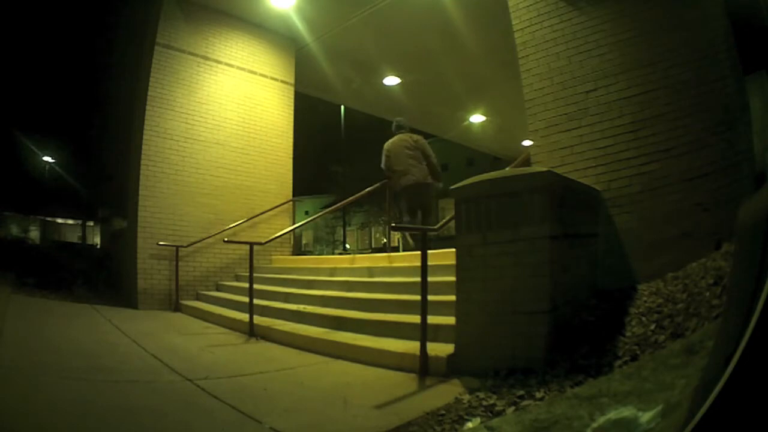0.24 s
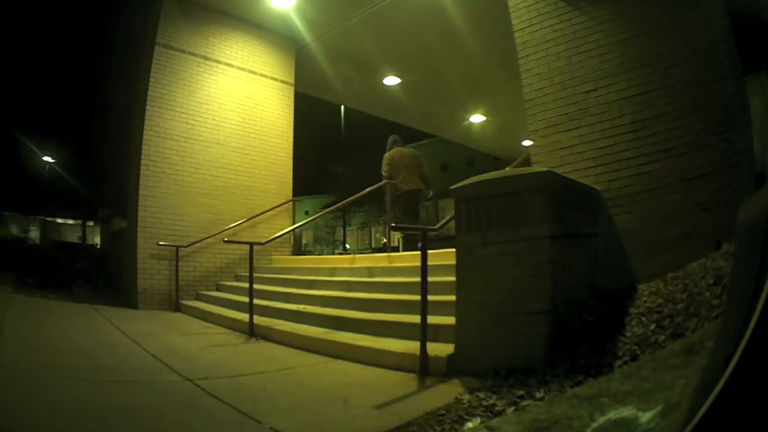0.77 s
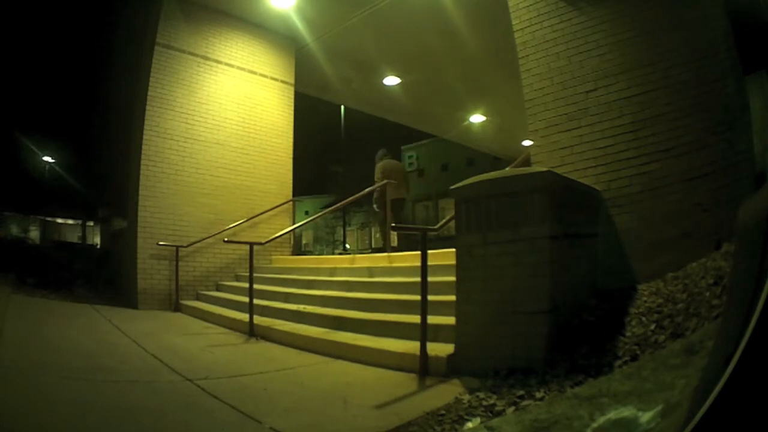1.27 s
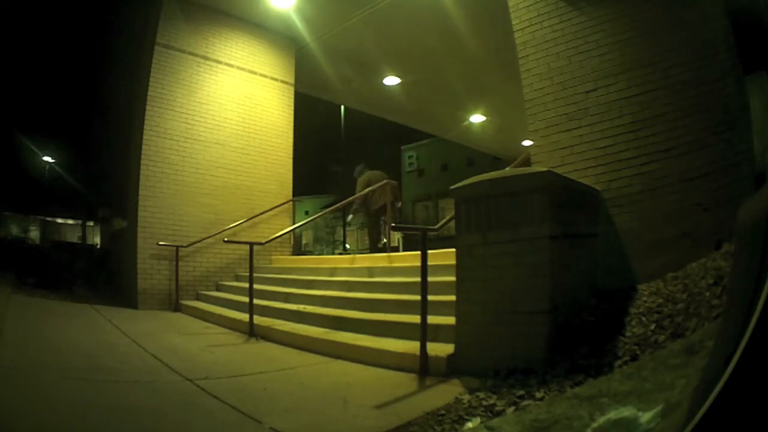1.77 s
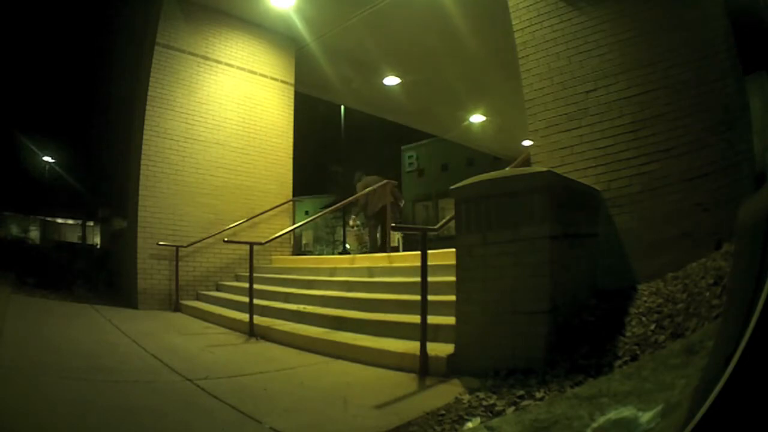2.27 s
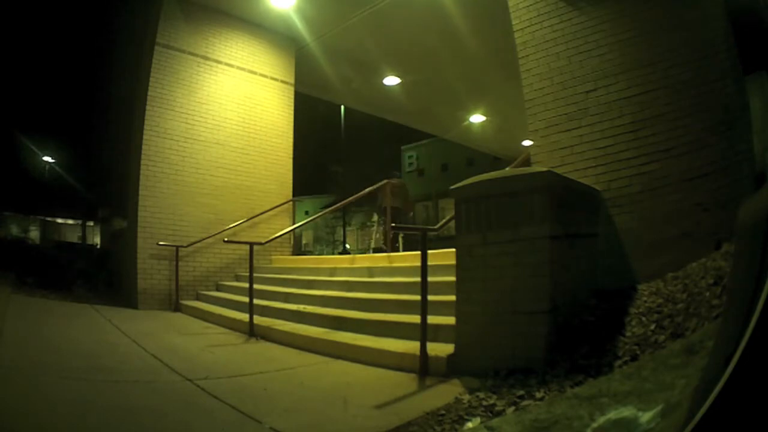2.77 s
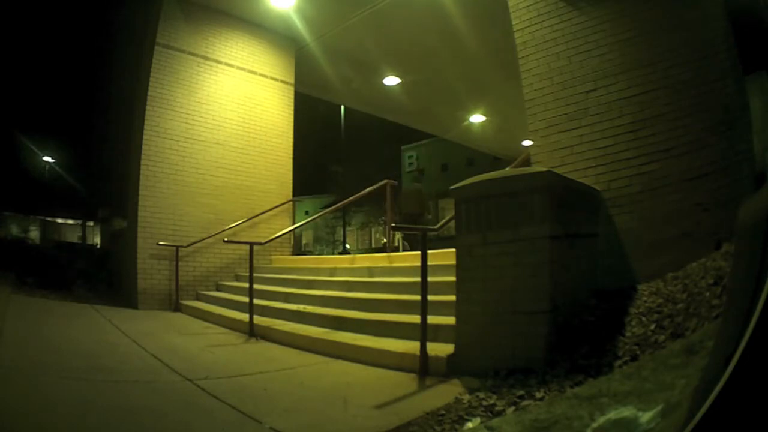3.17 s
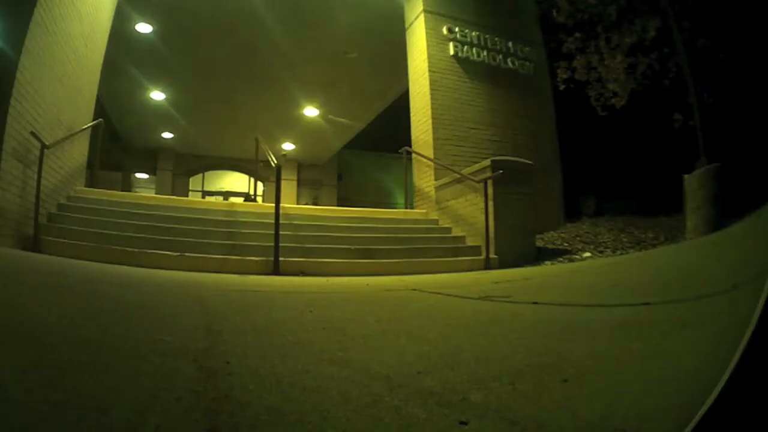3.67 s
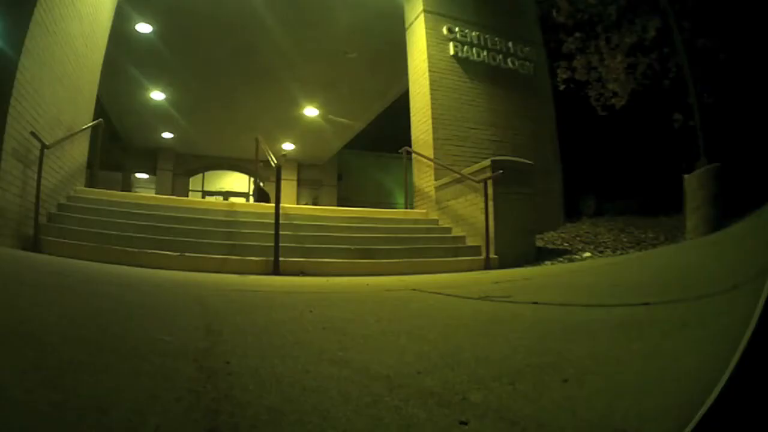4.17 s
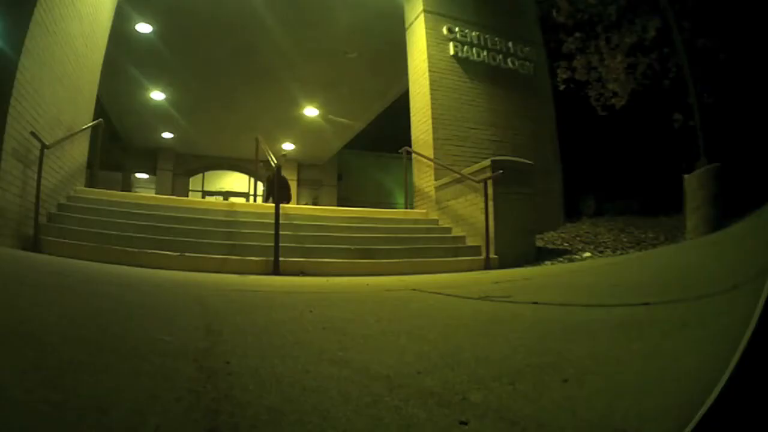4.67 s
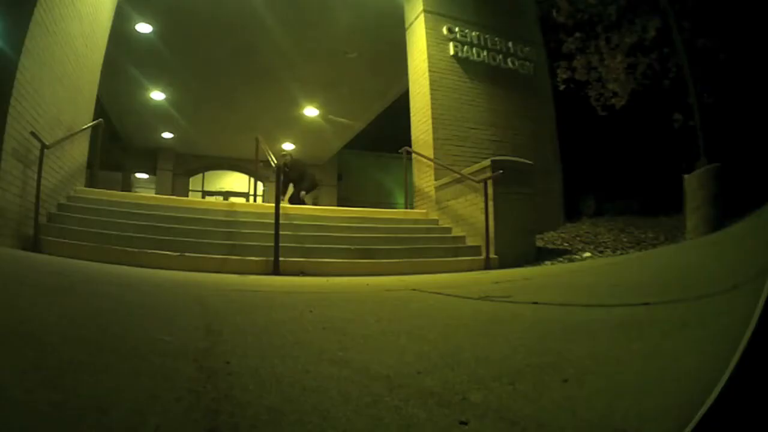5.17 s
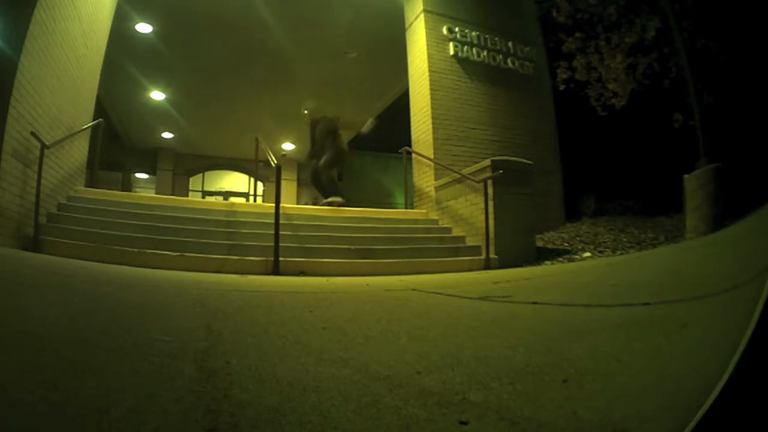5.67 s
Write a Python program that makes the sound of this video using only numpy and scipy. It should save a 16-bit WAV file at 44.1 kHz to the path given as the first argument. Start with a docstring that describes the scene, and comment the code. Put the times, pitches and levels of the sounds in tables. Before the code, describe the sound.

At night under a brick entrance canopy, a lamp buzzes thinly over a faint town hum. A few soft footsteps pass, then a skateboard is set down with several echoing wooden knocks. After a brief dip to silence, the board is heard from a second spot, rolling closer over rough concrete and clacking across slab joints. It ends with a sharp tail pop and a shoe scraping the grip tape.

```python
"""Night under a brick entrance canopy. A lamp buzzes over the hum of the town, and soft footsteps come up.
A skateboard is set down and stepped on; ceiling and walls throw every knock back.
After a short fade, from a second spot, the board rolls closer: rough concrete shakes the wheels,
the bearings fizz, and the axles clack across the slab joints. Last, the skater crouches,
pops the tail against the ground and drags a shoe up the grip tape."""
import sys
import numpy as np
from scipy import signal
from scipy.fft import rfft, irfft
from scipy.io import wavfile

SR = 44100
rng = np.random.default_rng(int(sys.argv[2]) if len(sys.argv) > 2 else 0)


def generate_wav(signal):
    """Clip the signal to [-1, 1] and save it as 16-bit WAV at the path in sys.argv[1]."""
    frames = np.transpose(np.atleast_2d(signal))
    scaled = np.clip(frames, -1, 1) * 32767
    pcm = np.round(scaled).astype(np.int16)
    wavfile.write(sys.argv[1], SR, pcm)


N = 261513
T = np.arange(N) / SR
SECOND_SPOT_S, POP_S = 3.5, 5.8424
HIGHEST_HZ = 15400


def gain_of(db):
    """Turns decibels into a number to multiply by."""
    return 10 ** (np.asarray(db) / 20)


def unit_level(x):
    """Scales a sound to an average (rms) level of 1."""
    return x / np.sqrt(np.mean(x ** 2) + 1e-20)


def noise(length=N):
    """Plain white hiss."""
    return rng.standard_normal(length)


def look_up(points, hz):
    """Reads between the rows of a table, on a log-frequency scale."""
    table_hz, value = np.transpose(points)
    return np.interp(np.log(hz + 1), np.log(table_hz + 1), value)


def add(mix, start_s, sound):
    """Mixes a sound in at a given time."""
    part = mix[round(start_s * SR):][:len(sound)]
    part += sound[:len(part)]


def coloured(x, points):
    """Makes each frequency louder or softer, as a table says."""
    return irfft(rfft(x) * gain_of(look_up(points, np.fft.rfftfreq(len(x), 1 / SR))), len(x))


def band(x, low_hz, high_hz, order=3):
    """Keeps what lies between two frequencies."""
    edges = [low_hz, min(high_hz, SR / 2.05)]
    return signal.sosfilt(signal.butter(order, edges, "band", fs=SR, output="sos"), x)


def lowpass(x, hz, order=2):
    """Softens everything above a frequency."""
    return signal.sosfilt(signal.butter(order, hz, fs=SR, output="sos"), x)


def drift(hz):
    """A slow random wobble of level 1."""
    return unit_level(lowpass(noise(), hz))


def tone_filter(x, gain_at, size=4096):
    """Filters by gain_at(hz), with no ringing ahead of a click."""
    hz = abs(np.fft.fftfreq(size, 1 / SR))
    log_gain = np.log(np.maximum(gain_at(hz), 1e-3))
    taps = np.fft.ifft(np.exp(np.conj(signal.hilbert(log_gain)))).real
    return signal.oaconvolve(x, taps[:size // 2])[:len(x)]


# the main tones of the lamp housing (frequency [Hz], level [dB])
LAMP_TONES = [(1680, -58.5), (2998, -56.5), (3241, -53), (3359, -54.5), (3478, -60.5), (3957, -61),
              (4081, -53), (4199, -61), (4436, -57), (4678, -51.5), (4797, -70.5), (4915, -45.5),
              (5039, -49), (5157, -54), (5276, -56), (5399, -57.5), (5879, -61.5), (5938, -56), (5997, -67),
              (6115, -57), (6239, -76.5), (6358, -50), (6417, -66), (6476, -53), (6595, -59.5), (6718, -94),
              (6837, -92), (6955, -60), (7197, -60.5), (9717, -72.5)]
# a few thin outlying tones (frequency [Hz], level [dB])
LAMP_THIN_TONES = [(360, -66.5), (720, -64), (7556, -67.5), (9055, -73), (9595, -93), (9955, -73),
                   (11994, -80)]
# outline of the faint tones in between (frequency [Hz], level [dB])
LAMP_FAINT_TONES = [(120, -72), (240, -78), (480, -65), (600, -70), (720, -66), (1000, -73), (1900, -75.5),
                    (2700, -72), (4500, -97), (6500, -60), (8300, -95), (9600, -85.5), (11500, -100.5),
                    (15000, -93)]
def lamp_buzz(mains_hz=59.969, flutter_db=0.14, uneven_db=4, odd_db=-6):
    """The lamp's ballast coil kicks its housing as the arc strikes and dies, each half mains cycle."""
    listed = {round(hz / mains_hz): db for hz, db in list(LAMP_TONES) + list(LAMP_THIN_TONES)}
    harmonics = np.arange(2, int(HIGHEST_HZ / mains_hz))
    faint_db = look_up(LAMP_FAINT_TONES, harmonics * mains_hz) + odd_db * (harmonics % 2)
    faint_db += uneven_db * noise(len(harmonics))
    levels_db = [listed.get(n, db) for n, db in zip(harmonics, faint_db)]
    lag = np.pi / 2 * (harmonics // 2 % 2)  # quarter-turn delays make the pair of kicks
    lag += .007 * harmonics ** 2  # the sheet metal smears each kick
    lag += 0.66 * noise(len(harmonics))  # wall reflections shift each tone
    turn = np.linspace(0, 1, 8193)
    cycle = gain_of(levels_db) @ np.cos(2 * np.pi * harmonics[:, None] * turn - lag[:, None])
    return np.sqrt(2) * np.interp(T * mains_hz % 1, turn, cycle) * gain_of(flutter_db * drift(6.8))


# tone colour of the night air (frequency [Hz], relative level [dB])
AIR_COLOUR = [(15, -5.5), (55, 1), (130, -4.5), (260, -10.5), (700, -12.5), (1000, -17.5), (1300, -11),
              (1700, -19), (3300, -22), (4800, -12), (7000, -22), (8600, -28), (10000, -33), (15000, -39.5)]
def night_air(db=-49.5, swell_db=.5):
    """The distant town rumbles and hisses."""
    return gain_of(db + swell_db * drift(4)) * unit_level(coloured(noise(), AIR_COLOUR))


# soft footfalls (time [s], level [dB])
FOOTFALLS = [(0.189, -47.5), (.265, -53), (.95, -51), (1.79, -54)]
def footsteps(rise_s=0.0032, fade_s=0.04):
    """Rubber soles land with dull puffs."""
    out, t = np.zeros(N), np.arange(SR // 4) / SR
    for start_s, db in FOOTFALLS:
        puff = unit_level(band(noise(len(t)), 280, 1200, order=2))
        add(out, start_s, gain_of(db) * puff * np.minimum(t / rise_s, 1) * np.exp(-t / fade_s))
    return out


def rustle(start_s=1.04, db=-61.5, rise_s=.015, fade_s=0.18):
    """A faint high rustle as the skater walks up."""
    age = np.maximum(T - start_s, 0)
    hiss = unit_level(band(noise(), 8500, 14000, order=1))
    return gain_of(db) * hiss * np.minimum(age / rise_s, 1) * np.exp(-age / fade_s)


# the notes a struck board rings with (frequency [Hz], relative level [dB], time to fade 60 dB [s])
BOARD_NOTES = [(162, -18.5, 0.11), (300, -15, 0.078), (403, -13, 0.066), (547, -8, 0.15), (793, -4, 0.035),
               (1033, 0, 0.014), (1320, -0.5, 0.016), (1715, 2.5, 0.0096), (2033, -0.5, 0.01),
               (3160, 7.5, 0.0048), (3860, 3.5, 0.0056), (4506, 2, 0.0091), (6300, -1.5, 0.0046)]
def board_blows(rows, snap_db, snap_s, snap_hz, detune, low_hz, contact_s, top_db):
    """Each blow snaps on the concrete, rings the board and echoes under the roof."""
    out, t = np.zeros(N), np.arange(SR * 3 // 5) / SR
    hz, note_db, ring_s = np.transpose(BOARD_NOTES)[:, :, None]
    for start_s, db, bass_db, treble_db, room_db in rows:
        pitch = hz * (1 + detune * noise(hz.shape))
        notes = np.sin(2 * np.pi * (pitch * t + rng.random(hz.shape)))
        ring = (gain_of(note_db - 60 * t / ring_s) * notes).sum(0)
        snap = gain_of(snap_db) * lowpass(noise(len(t)), snap_hz, order=1) * np.exp(-t / snap_s)
        struck = band((ring + snap) * np.minimum(t / contact_s, 1), low_hz, SR / 2)
        colour = [(330, bass_db), (800, 0), (2300, 0), (3200, treble_db), (7000, treble_db),
                  (12000, treble_db / 2 + top_db)]
        hit = gain_of(db) * tone_filter(struck, lambda f: gain_of(look_up(colour, f)))
        walls_db = 0 if start_s < SECOND_SPOT_S else -7  # the second spot stands clear of the walls
        add(out, start_s, with_echoes(hit, walls_db) + gain_of(room_db) * canopy_ring(hit))
    return out


# the deck's knocks (time [s], level [dB], extra bass [dB], extra treble [dB], room sound [dB])
DECK_KNOCKS = [(2.031, -34.5, -3.5, -1, 8), (2.067, -40, 10, 0, 4), (2.1605, -17, 0, 3.5, 1),
               (2.3410, -21, 2, -11.5, 3), (2.4452, -30, -0.5, -9, 4.5), (5.8424, -10.5, -5, -5, -3.5),
               (5.921, -24.5, -6, -14, 0)]
def deck_knocks():
    """The board hits the ground as it is set down, stepped on and finally popped."""
    return board_blows(DECK_KNOCKS, snap_db=7.5, snap_s=0.0011, snap_hz=4400, detune=0.014,
                       low_hz=258, contact_s=0.00026, top_db=-3)


# bounces off the ceiling and walls (delay [s], relative level [dB])
WALL_ECHOES = [(.0102, -5), (.0228, -14), (.0283, -17)]
def with_echoes(x, walls_db):
    """Hard surfaces nearby add late, quieter copies of a sound."""
    out = x.copy()
    for delay_s, db in WALL_ECHOES:
        add(out, delay_s, gain_of(db + walls_db) * x)
    return out


# how long sound lingers under the roof (frequency [Hz], time to fade 60 dB [s])
CANOPY_RING_TIMES = [(150, 1), (500, 0.66), (1400, 0.63), (4000, 0.42), (12000, 0.21)]
def canopy_ring(x, scatter_db=-5, scatter_s=0.016, tail_db=-10):
    """Steps and pillars scatter a sound, then it rings on under the roof."""
    t = np.arange(len(x)) / SR
    hz, age, spectrum = signal.stft(noise(len(x)), SR, nperseg=256)
    dying = gain_of(-60 * age / look_up(CANOPY_RING_TIMES, hz)[:, None])
    tail = signal.istft(spectrum * dying, SR, nperseg=256)[1][:len(x)]
    scatter = noise(len(x)) * np.exp(-t / scatter_s)
    build_up = np.clip(t / 0.0054 - .2, 0, 1)
    response = sum(gain_of(db) * build_up * part / np.linalg.norm(build_up * part)
                   for db, part in [(scatter_db, scatter), (tail_db, tail)])
    return signal.fftconvolve(x, response)[:len(x)]


# a clink as the board is lowered (time [s], level [dB], pitch [Hz])
TRUCK_CLINKS = [(2.040, -14, 4190)]
def truck_clink(length_s=.0021, room_db=-10):
    """A truck, the metal axle mount, gives a very short tick."""
    out, t = np.zeros(N), np.arange(SR // 3) / SR
    shape = np.sin(np.pi * np.minimum(t / length_s, 1))
    for start_s, db, hz in TRUCK_CLINKS:
        tick = gain_of(db) * shape * np.sin(2 * np.pi * hz * t)
        add(out, start_s, tick + gain_of(room_db) * canopy_ring(tick))
    return out


# the wood's notes (time [s], level [dB], pitch [Hz], crack level [dB])
PLYWOOD_NOTES = [(2.1603, -16, 1373, -9), (3.7182, -16, 1205, -34), (5.8422, -17, 975, -9.5)]
def plywood(ring_s=0.054, crack_hz=3320, crack_s=0.013, rise_s=0.00032, room_db=-6):
    """Hard blows make the plywood sing briefly, with a crack on top."""
    out, t = np.zeros(N), np.arange(SR // 2) / SR
    for start_s, db, hz, crack_db in PLYWOOD_NOTES:
        note = gain_of(db - 60 * t / ring_s) * np.sin(2 * np.pi * hz * t)
        note += gain_of(crack_db - 60 * t / crack_s) * np.sin(2 * np.pi * crack_hz * t)
        note *= np.minimum(t / rise_s, 1)
        add(out, start_s, note + gain_of(room_db) * canopy_ring(note))
    return out


# the concrete slabs (time reached [s], roughness [dB], thump level [dB])
CONCRETE_SLABS = [(3.69, 0.5, -47), (4.25, -3, -47), (4.78, 0, -34), (5.4888, 1, -38)]
def slab_surface(change_s=0.12):
    """Roughness and thump under the wheels: each slab has its own surface, and some lie loose."""
    out = np.array([np.zeros(N), np.full(N, CONCRETE_SLABS[0][2], float)])
    for start_s, *surface in CONCRETE_SLABS:
        arrived = np.clip((T - start_s) / change_s + .5, 0, 1)
        out += arrived * (np.array(surface)[:, None] - out)
    return out


# tone colour of wheels on concrete (frequency [Hz], relative level [dB])
ROLL_COLOUR = [(20, -18), (50, -18), (85, -13), (170, -2), (450, 0.5), (650, -5), (900, -10.5),
               (1400, -10.5), (2200, -20), (3400, -24), (4900, -22), (7000, -27.5), (9800, -38),
               (12000, -60), (15000, -66)]
def rolling(midway_s=5.0, grains_per_s=500, turn_hz=39, throb=0.17, airborne_db=-4, lift_s=0.027):
    """Rough concrete shakes the wheels, sand crackles, and the roll throbs with each wheel turn."""
    rough_db, thump_db = slab_surface()
    shake, past_midway_s = shudder(), T - midway_s
    # each layer follows the slab, the board's shaking and its approach
    rumble_db = -37 + 1.1 * rough_db + 10.5 * shake + past_midway_s
    roar_db = -32 + 0.32 * rough_db + 6 * shake + 0.5 * past_midway_s
    grit_db = -39 + 0.83 * rough_db - 0.5 * shake - 2 * past_midway_s
    texture = coloured(noise(), ROLL_COLOUR)
    grains = rng.random(N) < grains_per_s / SR
    grain_db = 4 * np.minimum(rng.exponential(1, N), 4)
    sand = grains * gain_of(grain_db) * rng.choice([-1, 1], N)
    crunch = coloured(noise() + 0.34 * unit_level(sand), ROLL_COLOUR)
    roll = gain_of(rumble_db) * unit_level(band(texture, 31, 298, order=4))
    roll += gain_of(roar_db) * unit_level(band(coloured(noise(), ROLL_COLOUR), 300, 850, order=4))
    roll += gain_of(grit_db) * unit_level(band(crunch, 740, 12700, order=4))
    roll += shake * gain_of(thump_db) * unit_level(band(noise(), 66.7, 101))
    roll += roll_notes(past_midway_s)
    turns = np.cumsum(turn_hz * (1 + 0.028 * drift(5.0))) / SR
    lift_off = gain_of(airborne_db * np.clip((T - POP_S) / lift_s, 0, 1))
    return roll * lift_off * (1 + throb * np.sin(2 * np.pi * turns))


def hollow_note(hz, db, width_hz):
    """A resonance of the roll: noise so narrow that it has a pitch."""
    angle = 2 * np.pi * np.cumsum(hz * np.ones(N)) / SR
    return gain_of(db) * (drift(width_hz) * np.cos(angle) + drift(width_hz) * np.sin(angle))


def roll_notes(past_midway_s, sink_hz_per_s=143, boom_from_s=3.59, boom_to_s=3.8, edge_s=0.021):
    """A hollow note sinks as the board nears, one slab booms, and the roll drones under the roof."""
    swell_db = -31.5 - 5 * (past_midway_s / 0.74) ** 2  # loudest midway
    sinking = hollow_note(479 - sink_hz_per_s * past_midway_s, swell_db, width_hz=24.4)
    on_slab = np.clip(np.minimum(T - boom_from_s, boom_to_s - T) / edge_s, 0, 1)
    boom = on_slab * hollow_note(hz=169, db=-27.5, width_hz=8.5)
    drone = hollow_note(hz=246.5, db=-42, width_hz=5.5)
    return sinking + boom + drone


# tone colour of the bearings (frequency [Hz], relative level [dB])
BEARING_COLOUR = [(7000, -40), (8600, -5.5), (9900, 0.5), (10700, -1), (11800, -14.5), (15000, -11.5)]
def bearings(surge_db=2, swell_s=.13, fade_s=0.036):
    """The spinning bearings fizz in surges; a wider hiss swells up to the pop and dies after it."""
    fizz_db = -58.5 + 0.5 * slab_surface()[0] + surge_db * drift(9.7)
    fizz = gain_of(fizz_db) * unit_level(coloured(noise(), BEARING_COLOUR))
    run_up = np.exp(-np.maximum((POP_S - T) / swell_s, (T - POP_S) / fade_s))
    hiss = gain_of(-53 + surge_db * drift(14)) * unit_level(band(noise(), 8800, 14000))
    return fizz + run_up * hiss


SLANT_S = .0075  # the board crosses at a slant, so one wheel lands this much ahead of its partner
# front, then rear axle dropping into a joint about every 0.6 s
# (time [s], level [dB], extra bass [dB], extra treble [dB], shudder [0-1], rebound delay [s])
AXLE_DROPS = [(3.6036, -21, 11, -4, 1, 0.023), (3.7184, -19.5, 2, -5, 0.76, 0.021),
              (4.1949, -19.5, 14, -5, .5, 0.05), (4.290, -24, 18.5, -2.5, 1, 0.033),
              (4.7836, -19, -1, -5, 0.55, 0.047), (4.890, -23.5, 15, -9, 0.94, .06),
              (5.384, -19.5, 8.5, -8.5, 0.4, 0.067), (5.4881, -21.5, -1, -15, 0.8, 0.069)]
# a pebble under a wheel (time [s], level [dB], extra bass [dB], extra treble [dB], room sound [dB])
PEBBLE_TICKS = [(5.122, -31, -2, -2, 2)]
def wheel_clacks(rattles=2, rattle_gap_s=.019, jitter=.25, uneven_db=2):
    """Each axle clacks into a slab joint, bounces once and rattles its truck; a pebble ticks too."""
    rows = []  # same columns as PEBBLE_TICKS
    for start_s, db, bass_db, treble_db, _, rebound_s in AXLE_DROPS:
        rows.append((start_s - SLANT_S, db - 6.5, bass_db, -16, 0))  # leading wheel
        rows.append((start_s, db, bass_db, treble_db, 0))  # main clack
        rows.append((start_s + rebound_s, db - 6.5, bass_db, -7, 1))  # rebound
        for k, (late, hard) in enumerate(noise((rattles, 2))):
            rattle_s = start_s + rattle_gap_s * (k + 1 + jitter * late)
            rattle_db = db - 12.5 + 0.5 * k + uneven_db * hard
            rows.append((rattle_s, rattle_db, bass_db / 2, -9, -4))
    return board_blows(rows + list(PEBBLE_TICKS), snap_db=6, snap_s=0.0034, snap_hz=5270,
                       detune=0.036, low_hz=126, contact_s=0.00052, top_db=-10)


def shudder(rise_s=.006, fade_s=.11, crouch_s=5.68, crouch_spread_s=0.083):
    """How hard the board shakes: each axle drop sets it off, and the crouch presses the wheels down."""
    out = .5 * np.exp(-((T - crouch_s) / crouch_spread_s) ** 2)
    for start_s, _, _, _, strength, _ in AXLE_DROPS:
        age = np.maximum(T - start_s + SLANT_S, 0)
        out += strength * np.minimum(age / rise_s, 1) * np.exp(-age / fade_s)
    return out


def grip_scrape(db=-35, rise_s=0.0084, fade_s=0.27):
    """The front shoe drags up the rough grip tape after the pop."""
    age = np.maximum(T - POP_S, 0)
    scrape = unit_level(band(noise(), 1100, 5500, order=2))
    return gain_of(db) * np.minimum(age / rise_s, 1) * np.exp(-age / fade_s) * scrape


# the fade between the two spots (time [s], volume [0-1])
SPOT_FADE = [(3.405, 1), (3.5, 0), (3.535, 1)]
def scene(far_lamp_db=-13.5):
    """Getting ready by the lamp, a fade through silence, then the ride, heard farther from the lamp."""
    knocks, clacks, buzz = deck_knocks(), wheel_clacks(), lamp_buzz()
    waiting = buzz + night_air() + rustle() + footsteps() + truck_clink()
    riding = gain_of(far_lamp_db) * buzz + rolling() + bearings() + clacks + grip_scrape()
    mix = np.where(T < SECOND_SPOT_S, waiting, riding) + knocks + plywood()
    fade = np.interp(T, *np.transpose(SPOT_FADE))
    return (fade * mix)[None]


# narrow bands that the microphone picks up weakly (frequency [Hz], width [Hz])
MICROPHONE_DIPS = [(2700, 513), (5510, 377), (7940, 1780), (10950, 850)]
def record(dry, depth=1.4, leak=0.044):
    """The microphone dulls a few narrow bands, and the very highest treble is cut off."""
    def dips(f):
        notches = [np.hypot(f - hz, leak * width) / np.hypot(f - hz, width / 2)
                   for hz, width in MICROPHONE_DIPS]
        return np.prod(notches, 0) ** depth
    treble_cut = signal.firwin(511, HIGHEST_HZ, window=("kaiser", 9), fs=SR)
    return signal.oaconvolve(tone_filter(dry[0], dips), treble_cut, "same")[None]


dry = scene()
out = record(dry)
generate_wav(out)
```